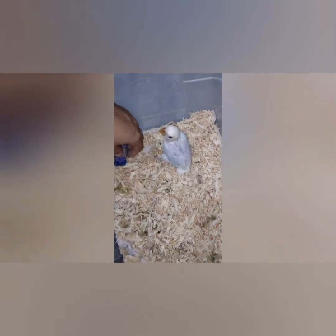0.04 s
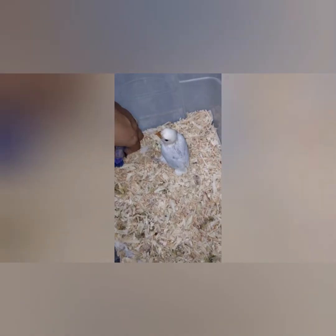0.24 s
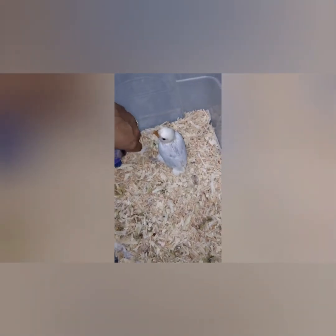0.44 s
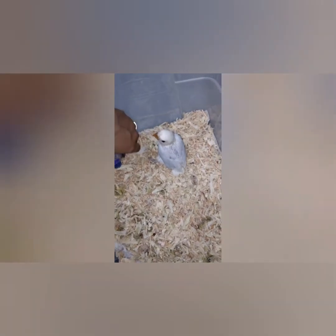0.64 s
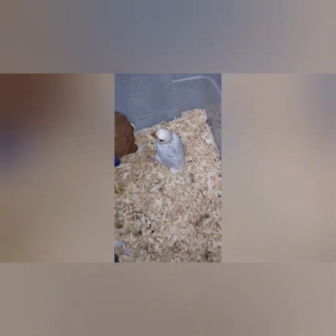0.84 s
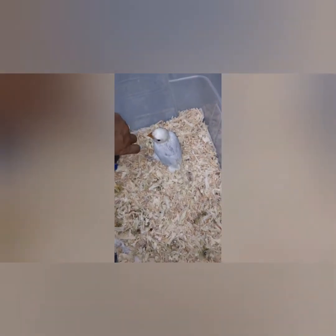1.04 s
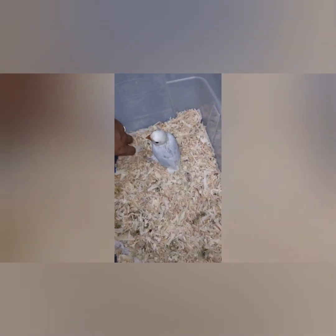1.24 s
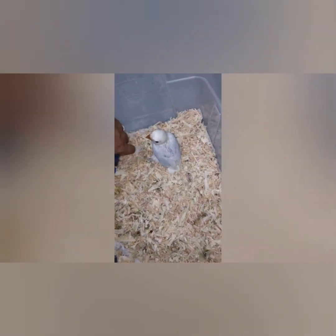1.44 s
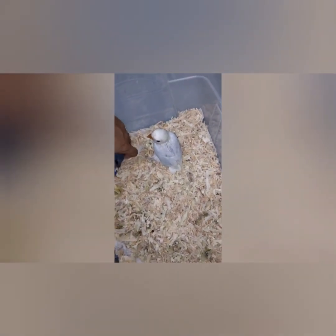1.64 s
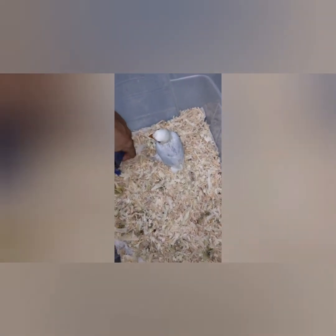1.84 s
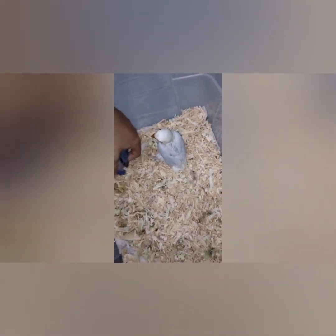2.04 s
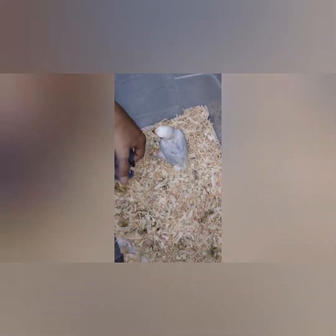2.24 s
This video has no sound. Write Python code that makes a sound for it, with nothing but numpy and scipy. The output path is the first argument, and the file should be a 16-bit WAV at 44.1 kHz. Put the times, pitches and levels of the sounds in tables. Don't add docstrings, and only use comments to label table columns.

```python
import sys
import numpy as np
from scipy import signal
from scipy.fft import rfft, irfft
from scipy.io import wavfile
from scipy.ndimage import uniform_filter1d

SR = 44100
rng = np.random.default_rng(int(sys.argv[2]) if len(sys.argv) > 2 else 0)


def boost_factor(decibels):
    exponent = np.asarray(decibels, float) / 20
    return 10 ** exponent


def materialize(psi):
    bounded = np.clip(np.atleast_2d(psi).T, -1, 1)
    quanta = np.round(bounded * 32767).astype(np.int16)
    wavfile.write(sys.argv[1], SR, quanta)


N = 101429

# (time [s], level [dB], pitch [Hz])
SCREECH_PATH = [
    (.178, -52, 1194),
    (0.185, -35, 1176),
    (0.201, -32.5, 1166),
    (0.215, -26, 1153),
    (0.241, -28, 1145),
    (0.275, -40, 1130),
    (0.297, -40.5, 1143),
    (0.324, -44, 1136),
    (0.345, -74, 1139),
]
# (centre [Hz], width [Hz], level [dB], left over right [dB], late opening [s])
THROAT_RESONANCES = [(2256, 960, -9, -3, 0.013), (3840, 420, -13, -6, 0.006), (4550, 690, -4.5, -5, 0.016),
                     (5676, 570, -0.5, -2, 0.05), (6910, 1300, -4, -21, 0.016),
                     (7570, 1200, -14, -27, 0.0055), (8510, 1300, -6.5, -19.5, 0.027),
                     (9270, 960, -9, -20, 0.0056), (10420, 890, -7.5, -13.5, 0.044),
                     (11530, 750, -7, -1, 0.05), (12900, 2800, -9.5, 0, 0.0022),
                     (5287, 2720, -3.5, -20.5, 0.037), (6980, 250, -9.5, -2, 0.01)]
# (frequency [Hz], level [dB])
BEAK_HOLLOWS = [(1300, -8), (1800, 0.5), (2550, 0.5), (2800, -9), (3500, -10), (3850, 0.5)]
RASP_BAND = [4040, 11700]

# (time [s], level [dB], low pitch [Hz], high pitch [Hz], brightness [dB per octave])
PEEP_CALLS = [
    (.136, -42, 1294, 1566, -3.5),
    (.9235, -42, 1328, 1508, -1),
    (1.636, -48, 1331, 1444, -7.5),
    (2.284, -42, 1276, 1480, -0.5),
]
# (length [s], pitch step [share of length], second half [dB],
# fade of top partials [dB], lean from third to fourth partial [dB])
PEEP_SINGING = [
    (.026, 0.487, -4.5, -24, -0.5),
    (0.0222, .5, 0.5, 1, -1.5),
    (0.017, 0.48, 3, 4, 0),
    (0.0232, .52, -9, -15, 4.5),
]
# (frequency [Hz], level [dB])
PEEP_SPECTRUM = [(1300, 2), (2700, 4.5), (3000, -5.5), (4000, -1.5), (4500, 6.5), (5300, 0.5), (6000, 5),
                 (7000, -16)]

# (time [s], level [dB], brightness [dB])
TUB_KNOCKS = [
    (0.884, -33.5, 7),
    (1.207, -39.5, 9),
    (1.694, -36.5, -3),
    (2.013, -47.5, 17),
]
# (frequency [Hz], level [dB], t60 [s])
TUB_MODES = [(129, -31, 0.074), (323.5, 0, 0.2), (266, -5, 0.016), (750, -10.5, 0.04), (1050, 0, 0.0074),
             (1474, -13, 0.011), (2100, -29.5, 0.026), (3370, -29, 0.014)]
# (time [s], level [dB], ring [Hz], snap [dB], t60 [s])
TICKS = [(0.659, -51.5, 1100, 3, 0.041), (0.843, -52.5, 1570, 7.5, 0.034),
         (0.918, -40, 1010, -35, 0.011), (0.923, -44.5, 900, -35, 0.015),
         (1.018, -42.5, 390, -8, 0.025), (1.071, -46, 930, 5.5, 0.017), (1.441, -60.5, 1330, 18, 0.033),
         (1.209, -49.5, 2540, 7, 0.015), (1.557, -49, 5300, -30, .04), (1.59, -45.5, 1050, -4, 0.035),
         (1.694, -37, 1630, 5.5, 0.019), (1.913, -43, 1050, -1, 0.02), (1.986, -51, 1000, 5, 0.013),
         (1.9905, -44, 795, -1, 0.015), (1.996, -37, 1107, -2.5, 0.021), (2.009, -45, 780, -2, 0.028),
         (2.022, -49, 930, -4, .027), (2.031, -56, 970, -20, 0.016), (2.046, -51, 1040, -17, .027),
         (2.126, -50, 720, -36, .027)]

# (time [s], level [dB], decay [s])
CRUNCHES = [(0.839, -43.5, 0.01), (0.905, -51, 0.0053), (1.162, -41.5, 0.02), (1.277, -37, 0.015),
            (1.341, -44, 0.014), (1.439, -41.5, 0.026), (1.556, -80, 0.017), (1.63, -46.5, 0.044),
            (1.683, -40.5, 0.051), (1.808, -39, 0.026), (1.991, -30.5, 0.016), (2.015, -38.5, 0.015),
            (2.115, -66, 0.015), (2.282, -42, 0.034)]
# (frequency [Hz], level [dB])
CRUNCH_SPECTRUM = [(1470, 8), (2500, -11), (3930, 7.5), (4580, 4), (6090, 2), (9210, 11.5), (15600, -0.5)]
# (time [s], level [dB])
RUSTLE_PATH = [(.1, -73.5), (0.131, -58), (.22, -64), (.45, -58), (.6, -62.5), (.67, -59), (.76, -64.5),
               (1.0, -61), (1.159, -54), (1.23, -61), (1.45, -53.5), (1.6, -53.5), (1.83, -57.5),
               (2.048, -57), (2.2, -63.5)]
# (frequency [Hz], level [dB])
RUSTLE_SPECTRUM = [(410, -20), (700, -12.5), (797, -16), (1430, -13), (1900, -20.5), (5460, -22),
                   (6290, -25), (9920, -14.5), (15600, -31.5)]

# (time [s], length [s], level [dB])
HORN_BLASTS = [
    (.56, .14, -69),
    (.76, .125, -67),
]
# (multiple of the pitch, level [dB])
HORN_PARTIALS = [(1, -1.5), (2, -1.5), (3, 2.5), (4, -3.5), (5, -1.5)]
# (time [s], length [s], pitch [Hz], level [dB])
LOW_DRONES = [
    (0, 0.19, 523, -68),
    (0.016, 0.48, 221, -64),
    (0.281, 0.246, 350.5, -60),
    (0.554, 0.28, 245, -69),
    (2.009, 0.083, 307, -59.5),
    (0.88, 0.085, 133, -49),
    (1.69, 0.095, 130, -53.5),
]

# (frequency [Hz], level [dB])
HUM_SPECTRUM = [(20, 19.5), (55, 9.5), (130, 1), (230, -3.5), (500, -7), (800, -15.5), (2500, -20),
                (15600, -29)]
# (frequency [Hz], likeness [0-1])
PORT_LIKENESS = [(40, 0.67), (200, 0.85), (550, 0.52), (1300, 0.176), (5000, 0.19), (15000, 0.42)]
# (frequency [Hz], phase [rad])
PORT_PHASE = [(40, 0.25), (300, 0.28), (700, 1.14), (1300, 1.66), (2500, 0.59), (15000, 6.1)]
LEFT_LAG = {"cry": 0.000181, "peep": 0.00027, "tap": 0.00011, "shavings": 0.00016}
# (frequency [Hz], t60 [s])
ROOM_T60 = [(300, 0.69), (1500, 0.61), (2500, 0.52), (5700, 0.48), (8000, 0.41), (12000, 0.38)]


def evened(x):
    return x / np.sqrt(np.mean(x ** 2) + 1e-20)


def wander(noise, size):
    return evened(uniform_filter1d(uniform_filter1d(noise, size=size), size=size))


def read(points, hz):
    f, value = np.transpose(points)
    return np.interp(np.log(hz + 1), np.log(f + 1), value)


def add(mix, s, sound):
    part = mix[..., max(round(s * SR), 0):][..., :sound.shape[-1]]
    part += sound[..., :part.shape[-1]]


def sides(db):
    return boost_factor(np.array([[db / 2], [-db / 2]]))


def filtered(x, tone):
    hz = np.fft.rfftfreq(x.shape[-1], 1 / SR)
    return irfft(rfft(x) * boost_factor(read(tone, hz)), x.shape[-1])


def resonate(x, hz, width):
    turn = np.exp(2j * np.pi * np.cumsum(hz * np.ones(len(x))) / SR)
    r = np.exp(-np.pi * width / SR)
    smoother = [[(1 - r) ** 2, 0, 0, 1, -2 * r, r * r]] * 2
    return 2 * (turn * signal.sosfilt(smoother, x / turn)).real


def screech_drive(t, hz):
    jitter, roughness, crackle_db = 0.25, 0.53, 2.5
    motion, breath = rng.standard_normal((2, N))
    turns = np.cumsum(hz * (1 + jitter * 5 * uniform_filter1d(motion, size=400))) / SR
    folds = sum(np.cos(2 * np.pi * k * turns) for k in range(1, 14))
    puffs = (0.27 + np.exp(-(turns % 1) / 0.073)) * breath
    drive = (1 - roughness) * evened(folds) + roughness * evened(puffs)
    return drive * boost_factor(crackle_db * wander(motion[::-1], 70))


def screech():
    ragged_db, throat_wander = 2.5, 0.013
    rasp_db, burst_db, burst_s = -4, -58, 0.26
    t = np.arange(N) / SR
    s, db, hz = np.transpose(SCREECH_PATH)
    drive = screech_drive(t, np.interp(t, s, hz))

    burst_gain = boost_factor(burst_db - 60 * abs(t - burst_s) / 0.39) * np.clip((t - burst_s) / 0.00125, 0, 1)
    burst = burst_gain * evened(resonate(drive, 7260, 3500))

    rasp_filter = signal.butter(5, RASP_BAND, "band", fs=SR, output="sos")
    rasp_gain = boost_factor(rasp_db + np.interp(t, s, db, -150, -150))
    rasp = rasp_gain * evened(signal.sosfilt(rasp_filter, drive))

    wavers = wander(rng.standard_normal((len(THROAT_RESONANCES), N)), 500)
    throat = np.zeros((2, N))
    for (centre_hz, width, level_db, pan_db, late), waver in zip(THROAT_RESONANCES, wavers):
        effort_db = np.interp(t - late, s, db, -150, -150)
        moving_hz = centre_hz * (1 + throat_wander * np.roll(waver, N // 2))
        gain = boost_factor(level_db + ragged_db * waver + effort_db)
        throat += sides(pan_db) * gain * evened(resonate(drive, moving_hz, width))
    return filtered(sides(-9.0) * (burst + rasp / 2) + throat / 2, BEAK_HOLLOWS)


def peeps():
    waver_db, glide, pan_db = 3, 0.091, 6
    echo_s, echo_db = 0.019, -7.5
    out = np.zeros((2, N))
    phases = rng.random((len(PEEP_CALLS), 2, 7))
    for call, singing, (waver_phase, start_phase) in zip(PEEP_CALLS, PEEP_SINGING, phases):
        start, db, low_hz, high_hz, tilt_db = call
        length, step, late_db, fade_db, lean_db = singing
        u = np.arange(0, length, 1 / SR) / length
        up = 1 / (1 + np.exp((step - u) / glide * 2))
        hz = low_hz + (high_hz - low_hz) * up
        turns = np.cumsum(hz) / SR
        voice = 0
        for k in range(1, 6):
            level_db = read(PEEP_SPECTRUM, k * hz) + tilt_db * np.log2(k) + fade_db * up * (k > 3)
            level_db = level_db + lean_db * ((k == 4) - 1. * (k == 3))
            level_db = level_db + waver_db * np.sin(2 * np.pi * (0.84 * u + waver_phase[k]))
            voice = voice + boost_factor(level_db) * np.cos(2 * np.pi * (k * turns + 0.47 * start_phase[k]))
        break_gain = 1 - 0.38 * np.exp(-((u - step) / 0.063) ** 2)
        peep = boost_factor(db + late_db * up) * break_gain * np.sin(np.pi * u) ** .5 * evened(voice)
        echo = boost_factor(echo_db) * uniform_filter1d(peep, size=9)
        add(out, start, sides(pan_db) * peep)
        add(out, start + echo_s, np.tile(echo, (2, 1)))
    return out


def tub_knocks():
    hold_s, damped_t60 = 0.012, 0.0048
    out, t = np.zeros((2, N)), np.arange(5000) / SR
    damp_db = -60 * np.maximum(t - hold_s, 0) / damped_t60
    onset = np.minimum(t / 0.0011, 1)
    for s, db, bright_db in TUB_KNOCKS:
        for hz, level_db, t60 in TUB_MODES:
            mode_db = db + level_db + bright_db * np.log2(hz / 315) / 2
            gain = boost_factor(mode_db - 60 * t / t60 + damp_db) * onset
            add(out, s, -gain * np.sin(2 * np.pi * hz * t))
    return out


def ticks():
    out, t = np.zeros((2, N)), np.arange(5000) / SR
    noises = rng.standard_normal((len(TICKS), 5000))
    for (s, db, hz, snap_db, t60), noise in zip(TICKS, noises):
        ring = boost_factor(-60 * t / t60) * np.sin(2 * np.pi * hz * t)
        snap_gain = boost_factor(-6.5 + snap_db - 60 * t / (1.6 * t60))
        snap = snap_gain * evened(resonate(noise, 1680, 8600))
        add(out, s, boost_factor(db) * (ring + snap))
    return out


def shavings():
    grains_per_s, grain_db = 7400, 4
    t = np.arange(N) / SR
    s, db = np.transpose(RUSTLE_PATH)
    size = boost_factor(grain_db * np.minimum(rng.exponential(1, (3, N)), 5))
    falls = rng.random((3, N)) < grains_per_s / SR
    grains = size * falls * rng.standard_normal((3, N))
    grains = grains[:2] + 0.46 * grains[2]

    flicker = boost_factor(0.9 * wander(rng.standard_normal(N), 900))
    rustle = evened(filtered(grains, RUSTLE_SPECTRUM)) * boost_factor(np.interp(t, s, db)) * flicker

    crunch_gain = np.zeros(N)
    for start, level_db, length in CRUNCHES:
        decay = np.exp(-np.maximum(t - start, 0) / abs(length))
        crunch_gain += boost_factor(level_db - 12.0) * decay * np.clip((t - start) / 0.0081 + 1, 0, 1)
    other_grains = np.roll(grains, N // 2, axis=1)
    return rustle + evened(filtered(other_grains, CRUNCH_SPECTRUM)) * crunch_gain


def horn():
    pitch_hz, waver_db, waver_hz = 417, 5, 13
    out = np.zeros((2, N))
    for start, length, db in HORN_BLASTS:
        t = np.arange(0, length, 1 / SR)
        swell = np.clip(np.minimum(t / 0.033, (length - t) / 0.0069), 0, 1)
        for k, partial_db in HORN_PARTIALS:
            level_db = db + partial_db + waver_db * np.sin(2 * np.pi * waver_hz * t + 2 * k)
            add(out, start, swell * boost_factor(level_db) * np.sin(2 * np.pi * k * pitch_hz * t + k * k))
    return out


def low_drones():
    out = np.zeros((2, N))
    noises = rng.standard_normal((len(LOW_DRONES), SR))
    for (start, length, hz, db), noise in zip(LOW_DRONES, noises):
        u = np.arange(SR // 2) / SR / length
        swell = np.clip(np.minimum(u, 1 - u) / 0.077, 0, 1)
        drone = evened(resonate(noise, hz, 70)[SR // 2:])
        add(out, start, boost_factor(db) * swell * drone)
    return out


def hum():
    hum_db, patch_db = -48.5, 0.79
    frames, hz = N // 256 + 5, np.fft.rfftfreq(1024, 1 / SR)
    a, b, c, d, patches = rng.standard_normal((frames, 513, 5)).T
    patches = uniform_filter1d(patches, size=10, axis=0)
    patches = evened(uniform_filter1d(patches, size=12, axis=1))
    same = np.clip(read(PORT_LIKENESS, hz), -1, 1)[:, None]
    phase = np.exp(-1j * read(PORT_PHASE, hz))[:, None]
    left = a + 1j * b
    right = phase * (same * left + np.sqrt(1 - same ** 2) * (c + 1j * d))
    z = np.array([left, right]) * boost_factor(read(HUM_SPECTRUM, hz)[:, None] + patch_db * patches)
    return boost_factor(hum_db) * evened(signal.istft(z, nperseg=1024, noverlap=768)[1][:, :N])


def room(x):
    gap_s, build_s = 0.0026, 0.0094
    reflections = np.zeros((2, SR))
    at = np.arange(0, SR - 20, 20) + rng.integers(0, 20, (2, (SR - 1) // 20))
    np.put_along_axis(reflections, at, rng.choice([-1., 1.], at.shape), 1)
    hz, t, z = signal.stft(reflections, SR, nperseg=256)
    z[1] += (z[0] - z[1]) * np.clip(1 - hz / 900, 0, 1)[:, None]
    z = z * boost_factor(-60 * t / read(ROOM_T60, hz)[:, None])
    tail = signal.istft(z, SR, nperseg=256)[1][:, :SR]
    tail = tail * np.clip((np.arange(SR) / SR - gap_s) / build_s, 0, 1)
    tail = tail / np.linalg.norm(tail[0])
    return signal.fftconvolve(x.mean(0)[None], tail, axes=1)[:, :N]


def lagged(x, lag_s):
    hz = np.fft.rfftfreq(N, 1 / SR)
    left = irfft(rfft(x[0]) * np.exp(-2j * np.pi * hz * lag_s), N)
    return np.array([left, x[1]])


def scene():
    cry_wet_db, peep_wet_db, tap_wet_db = 5, -13, -9
    cry, peep = screech(), peeps()
    tap = tub_knocks() + ticks()
    far = horn() + low_drones()
    wet = room(boost_factor(cry_wet_db) * cry + boost_factor(peep_wet_db) * peep + boost_factor(tap_wet_db) * tap + far / 2)
    near = {"cry": cry, "peep": peep, "tap": tap, "shavings": shavings()}
    direct = sum(lagged(x, LEFT_LAG[name]) for name, x in near.items())
    return direct + far + wet + hum()


def low_pass(x):
    return signal.sosfilt(signal.butter(12, 15780, fs=SR, output="sos"), x)


def record(dry):
    return low_pass(dry)


dry = scene()
out = record(dry)
materialize(out)
```